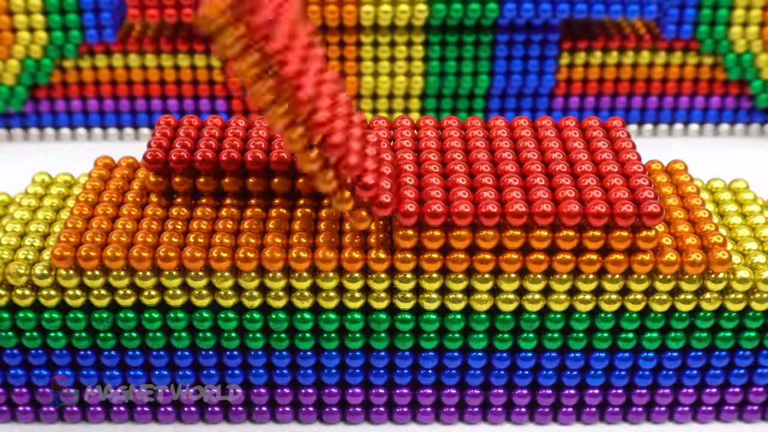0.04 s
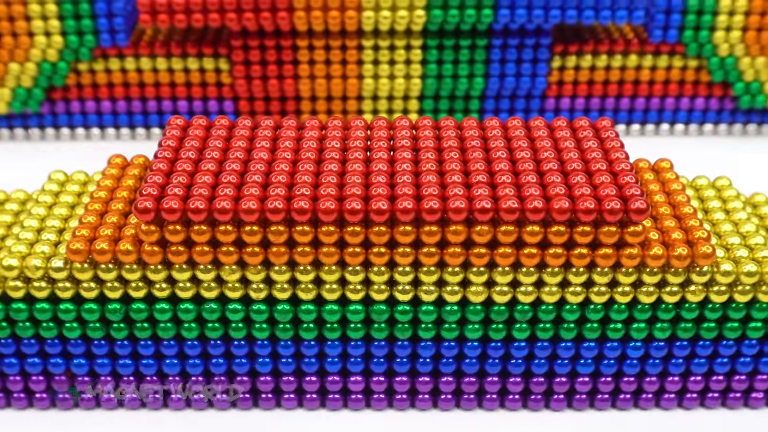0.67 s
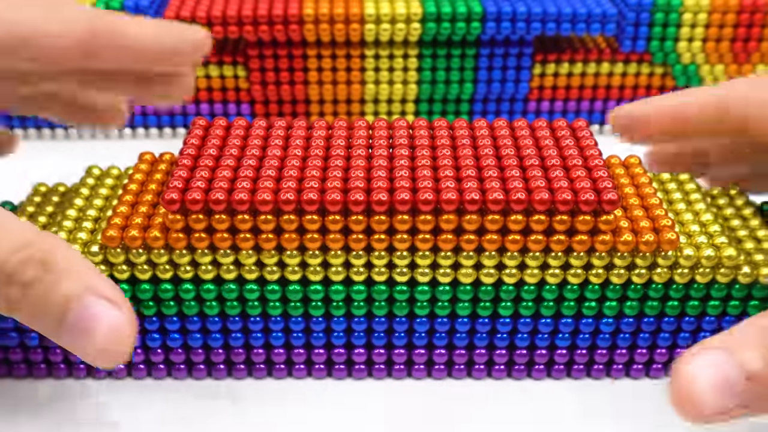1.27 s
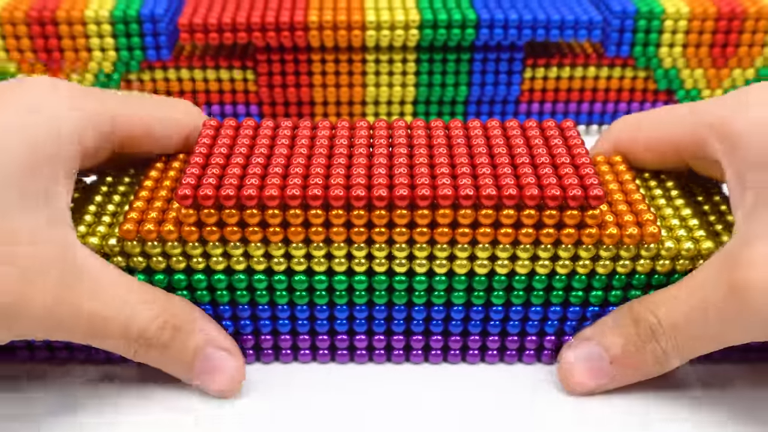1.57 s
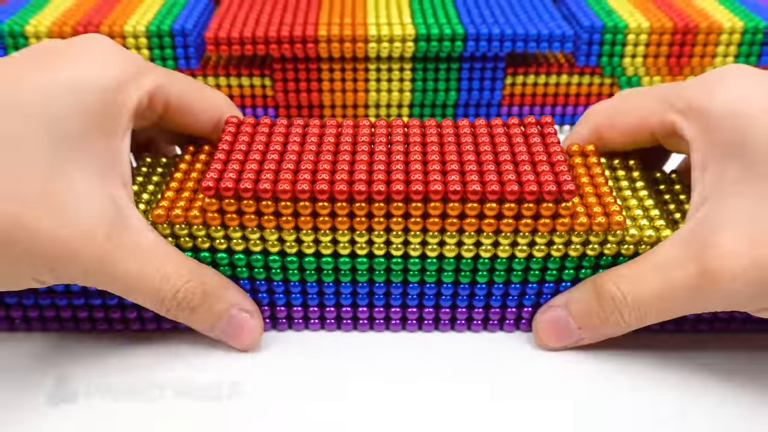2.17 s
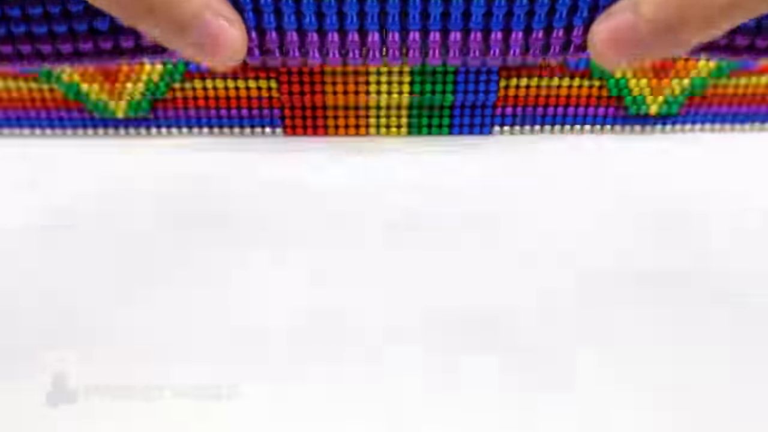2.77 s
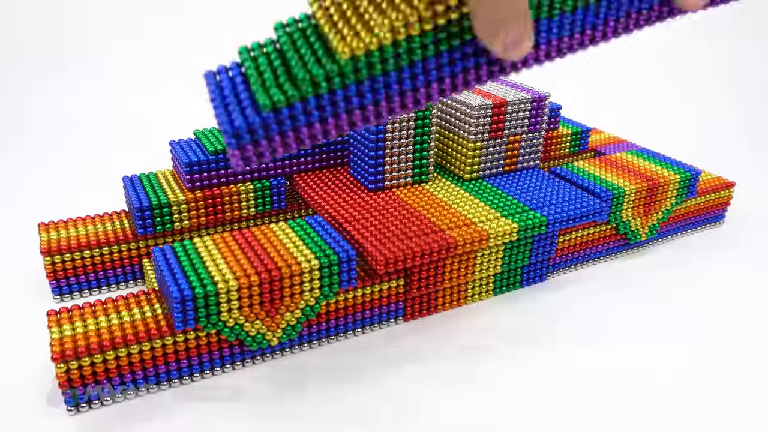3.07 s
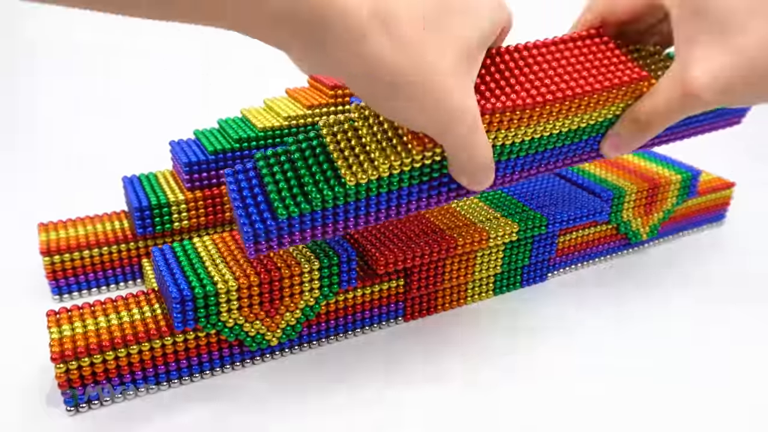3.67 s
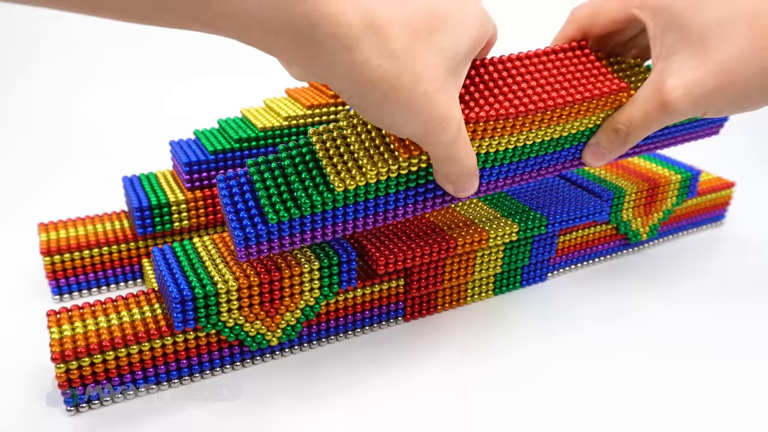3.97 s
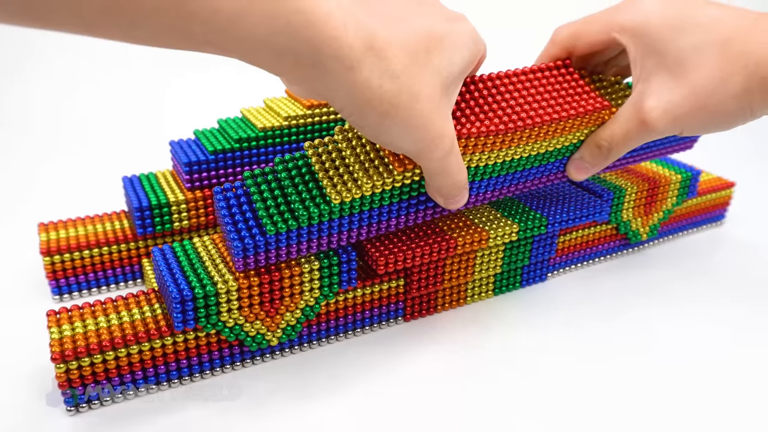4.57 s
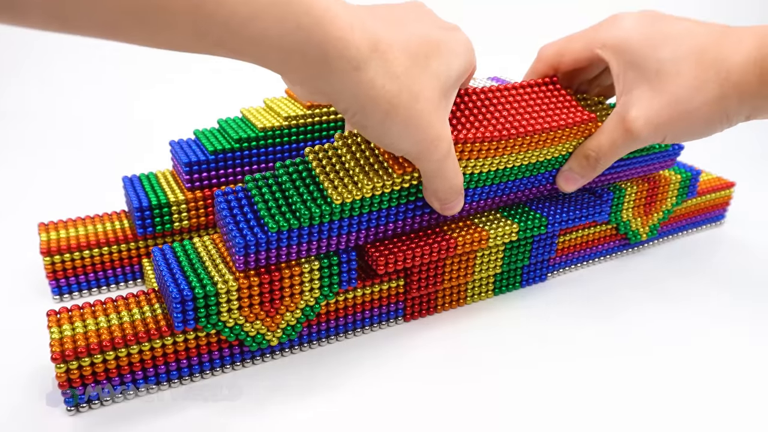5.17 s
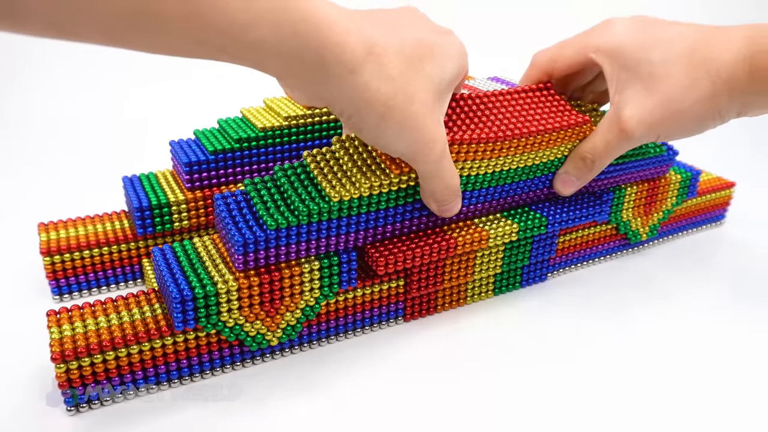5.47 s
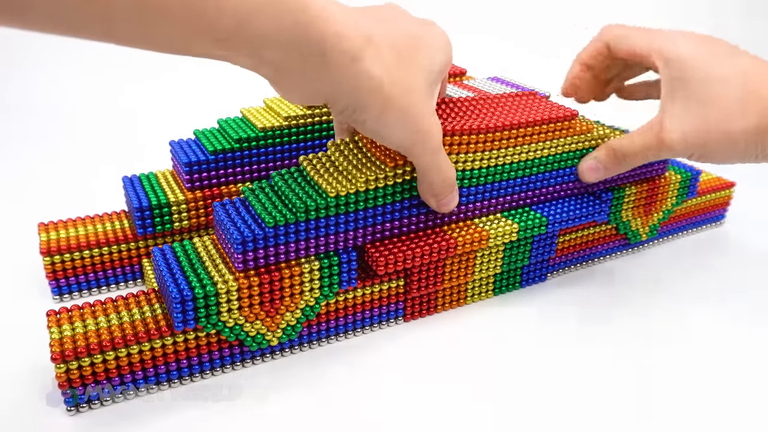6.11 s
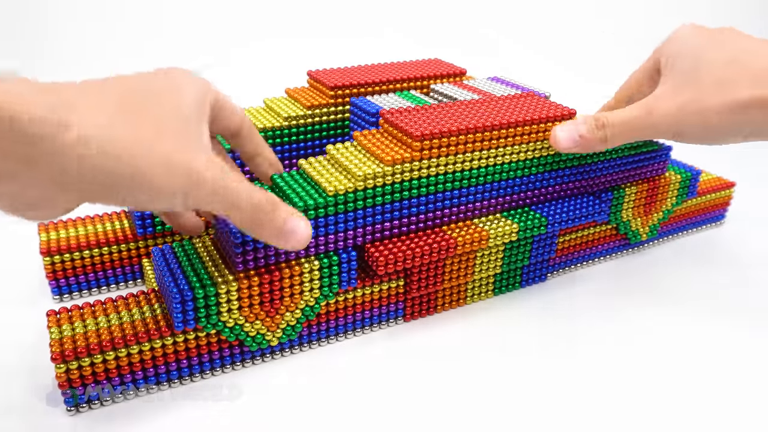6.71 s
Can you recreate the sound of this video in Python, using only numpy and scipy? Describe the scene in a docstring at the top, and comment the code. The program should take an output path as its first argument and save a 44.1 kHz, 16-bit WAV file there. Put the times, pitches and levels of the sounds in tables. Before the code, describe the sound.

One sharp snap of magnetic balls with a brief ring, a quiet stretch, then a few hollow clacks and soft handling.

```python
"""At a table in a small room, someone builds a model boat from small magnetic balls.
A sheet of balls quivers, snaps shut and overloads the microphone. Fingers grip the deck, which clacks
down onto the hull, and a hand bumps the boat. Each hit is a crack, ringing tones and a wash of noise.
A faint electric buzz and hiss lie underneath. From about the middle the scene runs fast, so the buzz
is higher and the clacks die sooner."""
import sys
import numpy as np
from scipy import signal
from scipy.fft import irfft
from scipy.io import wavfile
from scipy.ndimage import uniform_filter1d

SR = 44100
rng = np.random.default_rng(int(sys.argv[2]) if len(sys.argv) > 2 else 0)


def waveform_to_disk(signal):
    """Save audio, clipped to [-1, 1], as 16-bit WAV at the path in sys.argv[1]."""
    frames = np.transpose(np.atleast_2d(signal))
    scaled = np.clip(frames, -1, 1) * 32767
    samples = np.round(scaled).astype(np.int16)
    wavfile.write(sys.argv[1], SR, samples)


N = 302085

FAST_FROM_S, FAST_SPEED = 2.91, 1.401
BUZZ_HZ, BUZZ_ON_SHARE = 100.05, .2055   # pitch at normal speed; share of a cycle the current is on


def from_db(db):
    """Turn decibels into a number to multiply a sound by."""
    return 10 ** (np.asarray(db) / 20)


def at_hz(points, hz):
    """Read between the rows of a table, giving every octave equal room."""
    points = np.array(points)
    return np.interp(np.log(hz), np.log(points[:, 0]), points[:, 1])


def pan(db):
    """Left and right gains, with the left louder by db."""
    return from_db(np.array([[db], [-db]]) / 2)


def add(out, s, sound):
    """Mix a sound in, starting at s seconds."""
    start = round(s * SR)
    out[:, start:start + sound.shape[1]] += sound[:, :N - start]


def noise_bands(spectrum, likeness, size):
    """Stereo noise in bands whose powers add up to 1. A likeness of 1 makes left and right the same."""
    edges = np.geomspace(30, 17000, 28)
    centres = np.sqrt(edges[1:] * edges[:-1])
    power = from_db(at_hz(spectrum, centres)) ** 2 * np.diff(edges)
    bands = []
    for k, hz in enumerate(centres):
        band = signal.butter(2, edges[k:k + 2], "band", fs=SR, output="sos")
        pair = signal.sosfilt(band, rng.standard_normal((2, size + 4000)))[:, 4000:]
        mid, side = pair / pair.std(axis=1, keepdims=True)
        alike = np.clip(at_hz(likeness, hz), -1, 1)
        stereo = np.sqrt(1 + alike) * mid + np.sqrt(1 - alike) * side * [[1], [-1]]
        bands.append(np.sqrt(power[k] / power.sum() / 2) * stereo)
    return centres, np.array(bands)


def hiss():
    """A steady hiss, strongest in the low middle of the range."""
    # tone of the hiss: (frequency [Hz], relative level [dB per Hz])
    colour = [(50, -37.5), (90, -26.5), (130, -14), (250, 1), (500, 3.5), (1000, -1.5), (2000, -5),
              (4000, -8), (8000, -9.5), (10500, -12), (12500, -18), (15500, -10)]
    # stereo width of the hiss: (frequency [Hz], left-right likeness [-1 to 1])
    likeness = [(100, 0.56), (1000, .5), (8000, .4), (15000, 0.54)]
    _, bands = noise_bands(colour, likeness, size=N)
    return bands.sum(axis=0)


def buzz(speed, first_edge=0.62, low_cut_hz=200):
    """A current ticks twice a cycle, on and off, which weakens its overtones at regular steps."""
    # tone of the buzz before the dips and bass cut: (frequency at normal speed [Hz], level [dB])
    colour = [(100, 0), (200, -3), (300, -2), (400, -5), (500, -7), (700, -9.5), (1100, -14), (1700, -17.5),
              (2400, -22), (4000, -30), (7000, -41), (11000, -46)]
    harmonic = np.arange(1, 111)
    hz = harmonic * BUZZ_HZ
    edges = first_edge - np.exp(-2j * np.pi * harmonic * BUZZ_ON_SHARE)
    _, low_cut = signal.freqs(*signal.butter(4, low_cut_hz, "high", analog=True), hz * speed)
    cycle = irfft(np.r_[0, edges * low_cut * from_db(at_hz(colour, hz))], 4096)
    phase = np.arange(N) / SR * BUZZ_HZ * speed
    return np.interp(phase, np.arange(len(cycle)) / len(cycle), cycle * len(cycle) / 2, period=1)


def sizzle(speed, relative_db=-13, spark_s=.0006, band_hz=(2500, 8500)):
    """The harder tick of each buzz cycle carries a tiny spit of bright noise."""
    since_edge_s = (np.arange(N) / SR * BUZZ_HZ * speed - BUZZ_ON_SHARE) % 1 / BUZZ_HZ
    sparks = rng.standard_normal(N) * np.exp(-since_edge_s / spark_s)   # times at normal speed
    sparks = signal.sosfilt(signal.butter(2, band_hz, "band", fs=SR, output="sos"), sparks)
    return from_db(relative_db) * sparks / sparks.std()


def quiver(touches_per_s=2500, tone_hz=893, attack_s=.012, release_s=.025, fade_db_per_s=102):
    """Tiny, quick touches keep the loose balls singing until they lock together."""
    # tones of the loose balls: (pitch [Hz], width [Hz], relative level [dB])
    modes = [(893, 13, -6.5), (990, 30, -16), (1285, 62, -17), (1510, 44, -15.5), (1640, 60, -12),
             (1300, 400, -26.5)]
    # quivers just before and after the snap: (start [s], length [s], level [dB])
    quivers = [(.162, .025, -56.5), (0.328, 0.244, -42.5)]
    out, t = np.zeros((2, N)), np.arange(SR) / SR
    touches = (rng.random((2, SR)) < touches_per_s / SR) * rng.standard_normal((2, SR)) + 1e-18
    mid, side = sum(from_db(db) * signal.lfilter(*signal.iirpeak(hz, hz / width, fs=SR), touches)
                    for hz, width, db in modes)
    # the touches are soft and carry no treble
    soft = signal.butter(4, 1950, fs=SR, output="sos")
    sound = signal.sosfilt(soft, mid + from_db(-7) * side * [[1], [-1]])
    # the magnets' pull keeps the motion even
    power = uniform_filter1d(np.mean(sound ** 2, axis=0), SR // 25)
    sound /= np.sqrt(power + 1e-12)
    # the lowest tone rings on clearly
    sound += from_db(3.5) * np.sin(2 * np.pi * tone_hz * t)
    for s, length, level_db in quivers:
        age = np.maximum(t - s, 0)
        gate = np.clip(np.minimum(age / attack_s, 1 - (age - length) / release_s), 0, 1)
        add(out, 0, sound * gate * from_db(level_db - fade_db_per_s * age))
    return out


def ticks(fast, bass_db=-11, treble_db=-3, sparkle_db=13.5):
    """A single ball makes one tiny, glassy hit. Lists those in the fast or the normal-speed part."""
    # single balls jumping into place: (time [s], level [dB])
    jumps = [(0.1848, -22), (6.1190, -42.5), (6.1244, -39), (6.4250, -51.5)]
    return [(s, level_db, bass_db, treble_db, sparkle_db, 0)
            for s, level_db in jumps if (s > FAST_FROM_S) == fast]


def landings(rows, body_s, rebound_s, edge_db, edge_bass_db, edge_treble_db,
             rebound_db, rebound_bass_db, sparkle_db, sparkle_per_hardness):
    """A block of balls lands in three hits: a thin, bright edge, its whole body, then a weaker bounce."""
    stages = [(0, edge_db, edge_bass_db, edge_treble_db),
              (body_s, 0, 0, 0),
              (rebound_s, rebound_db, rebound_bass_db, 0)]
    hits = []
    for s, level_db, weight_db, hardness_db, pan_db in rows:
        for lag_s, gain_db, bass_db, treble_db in stages:
            # a soft landing loses its highest treble, the sparkle, most
            top_db = sparkle_db + sparkle_per_hardness * hardness_db + treble_db
            hits.append((s + lag_s, level_db + gain_db, weight_db + bass_db,
                         hardness_db + treble_db, top_db, pan_db))
    return hits


def contacts(hits, modes, crack_colour, wash_colour, crack_db, crack_fade_s, wash_db, wash_speed,
             wash_build_s, ring_db, ring_spread_db, rise_s, skew_radians):
    """Each hit cracks, rings at its own tones (modes) and leaves a wash of weaker tones and echoes."""
    # the wash dies first in the treble: (frequency [Hz], time to fade 60 dB at normal speed [s])
    wash_times = [(50, .3), (120, .5), (300, .33), (900, .33), (1700, .33), (3000, .245), (7000, .215),
                  (15000, .185)]
    # stereo width of the wash: (frequency [Hz], left-right likeness [-1 to 1])
    wash_likeness = [(60, .7), (300, 1), (1200, .6), (3000, .5), (7000, -0.032), (15000, -.15)]
    # stereo width of the crack: (frequency [Hz], left-right likeness [-1 to 1])
    crack_likeness = [(60, 0.52), (1200, 0.99), (4000, 0.97), (8000, -0.16), (14000, -.6)]
    out, t = np.zeros((2, N)), np.arange(SR // 2) / SR
    centres, crack = noise_bands(crack_colour, crack_likeness, size=2 * len(t))
    _, wash = noise_bands(wash_colour, wash_likeness, size=2 * len(t))
    band_hz = centres[:, None, None]
    mode_hz, mode_db, ring_s = np.transpose(modes)
    # friction between the balls soon stops every ring, the lowest ones last
    ring_s = np.minimum(ring_s, .34 * np.maximum(1, 200 / mode_hz))
    fade = -np.log(1000) * t   # exp(fade / x) falls 60 dB in x seconds
    # crack_fade_s holds at 1000 Hz; higher bands die sooner
    crack_fade = from_db(crack_db) * np.exp(fade / crack_fade_s * (band_hz / 1000) ** .25)
    # echoes need a few milliseconds to gather
    gather = 1 - np.exp(-t / wash_build_s)
    wash_fade = from_db(wash_db) * gather * np.exp(fade * wash_speed / at_hz(wash_times, band_hz))
    # many balls close one after another, so the start takes a moment
    attack = 1 - np.exp(-t / rise_s)
    for s, level_db, bass_db, treble_db, sparkle_db, pan_db in hits:
        colour = [(300, bass_db), (1200, 0), (4000, treble_db), (12000, sparkle_db)]
        start = rng.integers(len(t))
        part = slice(start, start + len(t))
        bands = crack[..., part] * crack_fade + wash[..., part] * wash_fade
        sound = np.tensordot(from_db(at_hz(colour, centres)), bands, axes=1)
        # every hit mixes the tones anew, and each reaches left and right a little out of step
        strength, skew = rng.standard_normal((2, len(modes)))
        gains = from_db(ring_db + mode_db + at_hz(colour, mode_hz) + ring_spread_db * strength)
        for k, hz in enumerate(mode_hz):
            ring = np.sin(2 * np.pi * hz * t + skew_radians * skew[k] * np.array([[1], [-1]]))
            sound += (-1) ** k * gains[k] * np.exp(fade / ring_s[k]) * ring
        add(out, s, sound * attack * from_db(level_db) * pan(pan_db))
    return out


def sheet_snaps():
    """The sheet of balls shuts with a hard, bright snap close to the microphone."""
    # the snap, then a shift in the grip: (time [s], level [dB], bass [dB], treble [dB], pan left [dB])
    snaps = [(0.1896, 1, -0.5, -2, 0), (1.917, -51.5, -5, -12, -2)]
    # ringing of the sheet: (pitch [Hz], relative level [dB], time to fade 60 dB before friction [s])
    modes = [(128, -27.5, .55), (277, -10.5, 0.37), (423.4, -13.5, 0.38), (497.5, 1, .2), (581, -2, 0.2),
             (642, -6, .22), (747, -6.5, 0.4), (816.3, -6, 0.48), (849, -2, .24), (1029, -6, 0.3),
             (1097, -11, 0.57), (1137, -8, 0.44), (1193, -8, 0.22), (1423, -12.5, 0.31),
             (1564, -10.5, 0.34), (1580, -7, .27), (1640, -5, .32), (1777.3, -12, 0.54), (1956, -11.5, .23),
             (3790, -13.5, .21)]
    # tone of the first crack: (frequency [Hz], relative level [dB per Hz])
    crack = [(40, -7), (200, -11.5), (700, -0.5), (1500, -1), (4000, -7.5), (8000, -6.5), (16000, -11)]
    # tone of the wash after it: (frequency [Hz], relative level [dB per Hz])
    wash = [(40, -33.5), (75, -25), (120, -15.5), (220, -14), (450, -1.5), (850, 4), (1180, -3.5),
            (1650, 0.5), (2400, -6.5), (3100, -8), (3750, -4.5), (4500, -11), (7000, -14.5), (11000, -16),
            (16000, -17.5)]
    hits = ticks(fast=False) + landings(
        snaps, body_s=.002, rebound_s=.0152, edge_db=-7.5, edge_bass_db=-8, edge_treble_db=11.5,
        rebound_db=-6.5, rebound_bass_db=-0.5, sparkle_db=2.08, sparkle_per_hardness=2.4)
    return contacts(hits, modes, crack, wash, crack_db=0, crack_fade_s=.04,
                    wash_db=-8, wash_speed=1, wash_build_s=.006,
                    ring_db=-13, ring_spread_db=2.5, rise_s=.0003, skew_radians=0.67)


def rubbing(rows, width, side_db):
    """Rubbing stirs just one band of noise, which swells and fades."""
    out, t = np.zeros((2, N)), np.arange(SR // 2) / SR
    for s, level_db, hz, rise_s in rows:
        band = signal.butter(4, [hz * np.exp(-width), hz * np.exp(width)], "band", fs=SR, output="sos")
        mid, side = signal.sosfilt(band, rng.standard_normal((2, SR)))[:, -len(t):]
        noise = (mid + from_db(side_db) * side * [[1], [-1]]) / mid.std()
        swell = t / rise_s * np.exp(1 - t / rise_s)
        add(out, s, from_db(level_db) * swell * noise)
    return out


def finger_nudges():
    """Soft fingers sound dull; the balls that they shift rustle higher up."""
    # fingers pressing and shifting the blocks, and last the rub of the hand bumping the hull: (time [s], level
    # [dB], pitch [Hz], rise time [s])
    presses = [(1.17, -74, 500, 0.046), (2.064, -68, 450, 0.04), (4.504, -63.5, 407, 0.013),
               (5.74, -71.5, 516, 0.022), (6.46, -50, 388, 0.015), (6.78, -53, 295, 0.04)]
    # balls rubbing together in the grip: (time [s], level [dB], pitch [Hz], rise time [s])
    rustles = [(1.915, -67, 2120, 0.017), (5.360, -69, 1500, 0.0081), (5.645, -65.5, 1710, 0.014),
               (6.101, -44, 1910, 0.0035), (6.246, -64.5, 1770, 0.012), (6.427, -56.5, 1760, 0.012)]
    return rubbing(presses, width=0.33, side_db=-7.5) + rubbing(rustles, width=0.26, side_db=-8)


def hull_clacks(low_cut_hz=230, grip_damping=1.093):
    """The deck meets the hull in hollow clacks with little bass, damped by the hands."""
    # the deck landing and settling: (time [s], level [dB], bass [dB], treble [dB], pan left [dB])
    clacks = [(5.4038, -18, -3.5, -18, 0), (5.655, -58, 8, -24, 5), (6.1040, -35, 5, -23, 8),
              (6.1145, -23.5, 6, -11, 0), (6.166, -51, -3, -18, 3), (6.433, -50, -4, -22, 5),
              (6.4615, -42, -13, -14.5, -2)]
    # ringing of the hull: (pitch [Hz], relative level [dB], time to fade 60 dB [s])
    modes = [(415, -8, .2), (479, -6, .19), (595, -2, .19), (705, -5, .18), (759, -1, .19), (872, -2, .16),
             (1184, -5, .14), (1351, -7, .16), (1470, -3, .14), (1841, -9, .15), (2035, -6, .12),
             (2207, -11, .11), (2379, -11, .13)]
    # tone of the first crack: (frequency [Hz], relative level [dB per Hz])
    crack = [(40, -38), (150, -22), (300, -33), (700, 1.5), (1800, 7.5), (4000, -10), (8000, -8.5),
             (16000, -15)]
    # tone of the wash after it: (frequency [Hz], relative level [dB per Hz])
    wash = [(40, -28), (170, -20.5), (260, -10.5), (420, -14.5), (720, -3), (1100, -9), (1750, -6),
            (2400, -10.5), (4000, -13), (7000, -23), (11000, -23), (16000, -37)]
    hits = ticks(fast=True) + landings(
        clacks, body_s=.0046, rebound_s=.0112, edge_db=1.27, edge_bass_db=-3.5, edge_treble_db=11,
        rebound_db=-2.5, rebound_bass_db=4.5, sparkle_db=-11, sparkle_per_hardness=1.94)
    sound = contacts(hits, modes, crack, wash, crack_db=-2.5, crack_fade_s=.05,
                     wash_db=-10.5, wash_speed=FAST_SPEED * grip_damping, wash_build_s=.0016,
                     ring_db=-16.5, ring_spread_db=5.5, rise_s=.00023, skew_radians=0.6)
    return signal.sosfilt(signal.butter(2, low_cut_hz, "high", fs=SR, output="sos"), sound)


def hand_bumps(pitch_hz=266, rise_s=.006, pan_db=4):
    """A soft push rocks the hull back and forth a few times."""
    # a hand bumping the hull: (time [s], level [dB])
    bumps = [(6.758, -50.5), (6.770, -40), (6.792, -43)]
    out, t = np.zeros((2, N)), np.arange(SR // 2) / SR
    swell = (t / rise_s * np.exp(1 - t / rise_s)) ** 2
    for s, level_db in bumps:
        add(out, s, from_db(level_db) * pan(pan_db) * swell * np.sin(2 * np.pi * pitch_hz * t))
    return out


def scene():
    """Snaps, clacks and handling over a faint buzz and hiss."""
    faint_hiss = from_db(-73) * hiss()
    handling = sheet_snaps() + quiver() + hull_clacks() + finger_nudges() + hand_bumps()
    normal_buzz = from_db(-72) * (buzz(speed=1) + sizzle(speed=1))
    fast_buzz = from_db(-70) * (buzz(FAST_SPEED) + sizzle(FAST_SPEED))
    faint_buzz = np.where(np.arange(N) / SR > FAST_FROM_S, fast_buzz, normal_buzz)
    return handling + (faint_buzz + faint_hiss) * pan(-0.65)


def record(dry, cutoff_hz=15850):
    """The loudest snap overloads the microphone, and the highest treble is cut off."""
    clipped = np.clip(dry, -1, 1)
    return signal.sosfilt(signal.ellip(10, .1, 80, cutoff_hz, fs=SR, output="sos"), clipped)


dry = scene()
out = record(dry)
waveform_to_disk(out)
```